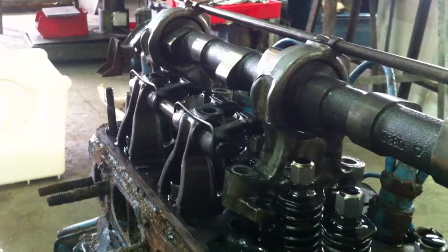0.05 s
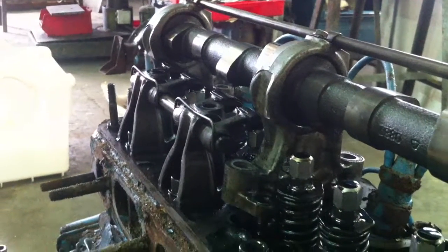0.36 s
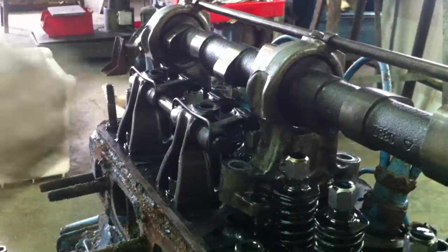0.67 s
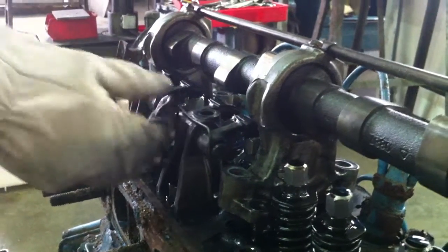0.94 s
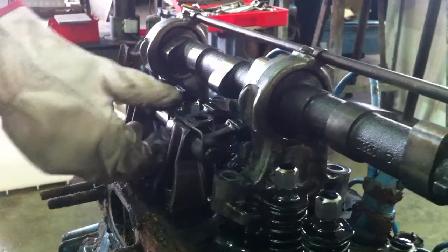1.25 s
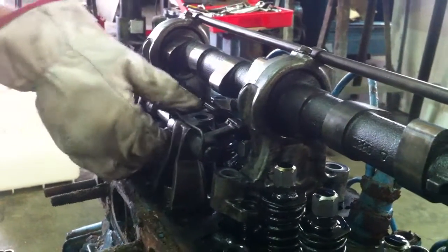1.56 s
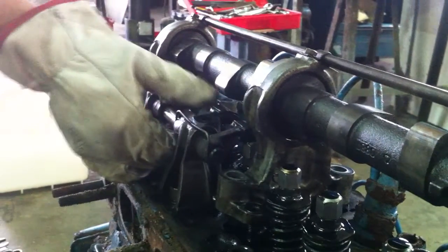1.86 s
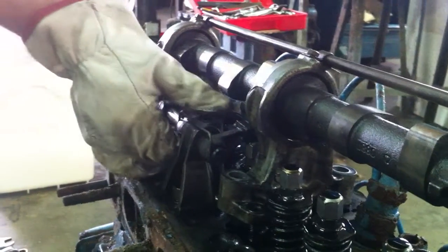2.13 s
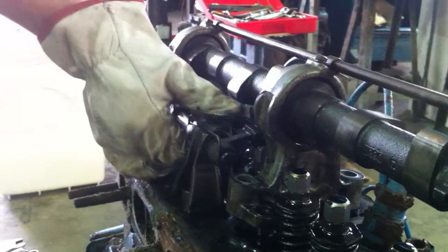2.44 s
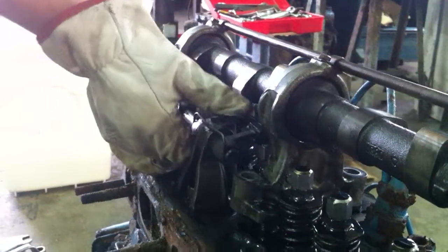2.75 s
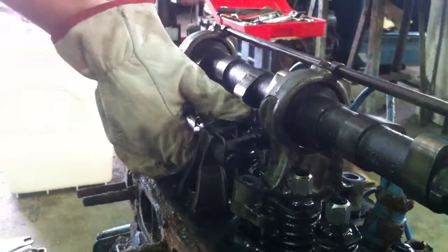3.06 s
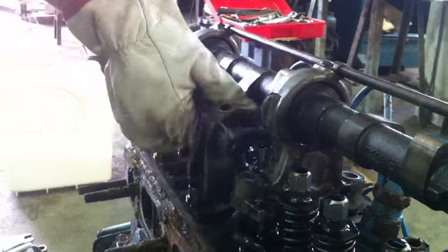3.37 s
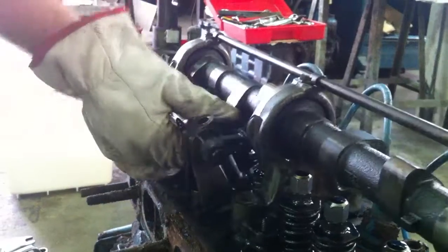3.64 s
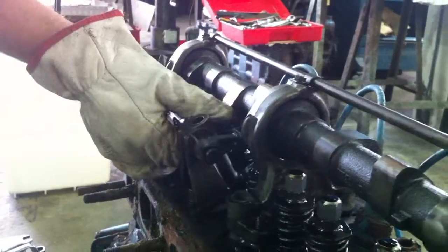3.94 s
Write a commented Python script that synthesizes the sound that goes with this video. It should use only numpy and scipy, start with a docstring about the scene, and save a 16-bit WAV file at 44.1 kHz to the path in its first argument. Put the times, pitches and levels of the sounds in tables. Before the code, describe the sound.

Stuck metal engine part cracks free and clanks into place after faint glove rubbing.

```python
"""A quiet workshop, one microphone near an open cylinder head, over room tone and a machine hum.
A gloved hand grips a rocker arm: leather rubs and taps on oily metal, and one dry tick sounds close by.
At 3.4 s the stuck part breaks free with a run of sharp cracks, scrapes along and clanks home.
Each blow shakes the damped casting; the steel rings on briefly and the hall answers."""
import sys
import numpy as np
from scipy import signal
from scipy.fft import rfft, irfft
from scipy.io import wavfile

SR = 44100
rng = np.random.default_rng(int(sys.argv[2]) if len(sys.argv) > 2 else 0)


def dump_mix(stems):
    """Bounce the given channels to the path in sys.argv[1] as a 16-bit WAV at rate SR."""
    frames = np.atleast_2d(stems).T  # one column per channel
    limited = np.clip(frames, -1, 1)  # hard clip at full scale
    pcm = np.round(limited * 32767).astype(np.int16)
    wavfile.write(sys.argv[1], SR, pcm)


N = 176400
T = np.arange(N) / SR


def from_db(db):
    """Decibels to gain."""
    return 10 ** (np.asarray(db) / 20)


def rms_one(x):
    """Scale to unit rms."""
    return x / np.sqrt(np.mean(x ** 2) + 1e-20)


def fader(curve):
    """Gain over time from points of t/s, level/dB."""
    return from_db(np.interp(T, *np.transpose(curve)))


def at_hz(points, hz):
    """Read a table on a log-frequency axis."""
    f, value = np.transpose(points)
    return np.interp(np.log(np.maximum(hz, 1)), np.log(f), value)


def coloured(x, colour):
    """Equalise by points of f/Hz, relative level/dB; rms 1."""
    gain = from_db(at_hz(colour, np.fft.rfftfreq(len(x), 1 / SR)))
    return rms_one(irfft(rfft(x) * gain, len(x)))


def noise(colour, size=N):
    """Equalised noise; rms 1."""
    return coloured(rng.standard_normal(size), colour)


def decay(t60, size=N):
    """Exponential fall of 60 dB in t60 seconds."""
    return np.exp(-np.log(1000) * T[:size] / t60)


def ring(hz, t60, size=SR // 2):
    """A struck mode: a decaying sine."""
    return np.sin(2 * np.pi * hz * T[:size]) * decay(t60, size)


def lowpass(x, hz):
    """Two-pole low-pass."""
    return signal.sosfilt(signal.butter(2, min(hz, SR * .45), fs=SR, output="sos"), x + 1e-18)


def add(out, start_s, sound):
    """Mix a sound in at a time."""
    i = int(start_s * SR)
    out[i:i + len(sound)] += sound[:N - i]


def struck_modes(rows):
    """One ringing mode for each row of t/s, level/dB, f/Hz, t60/s."""
    out = np.zeros(N)
    for start_s, db, hz, t60 in rows:
        add(out, start_s, from_db(db) * ring(hz, t60))
    return out


def friction(colour, slips_per_s, spread_db):
    """Rubbing surfaces make many tiny slips of uneven size; rms 1."""
    sizes = from_db(spread_db * np.minimum(rng.exponential(1, N), 4))
    signs = rng.choice([-1, 1], N)
    slipping = rng.random(N) < slips_per_s / SR
    return coloured(sizes * signs * slipping, colour)


def workshop():
    """The background: room tone, a wavering machine hum and a dull sound dying away at the start."""
    # spectra of the room tone and the dull sound: f/Hz, relative level/dB
    air_colour = [(15, -63), (25, -38), (69, -28), (119, -17), (164, -5), (267, -8.5), (297, -1),
                  (359, -12.5), (389, -5.5), (421, -11), (614, -13.5), (666, -14), (919, -16.5),
                  (3440, -22), (15500, -29)]
    fading_colour = [(150, -21), (330, -4), (480, 1), (700, -7), (1200, -22), (5000, -30), (15000, -40)]
    hum_hz = 299.5
    waver = 1 + .4 * rms_one(lowpass(rng.standard_normal(N), hz=4))
    hum = from_db(-76) * np.sqrt(2) * np.sin(2 * np.pi * hum_hz * T) * waver
    air = from_db(-65.5) * noise(air_colour)
    fading = from_db(-59.5) * decay(t60=.6) * noise(fading_colour)
    return air + hum + fading


def hall(x):
    """The hall's answer alone: a diffuse tail that builds up and dies sooner in the treble."""
    # spectrum of the tail before it decays: f/Hz, relative level/dB
    tail_colour = [(60, -30), (200, -5.5), (500, 0), (1000, -2), (2000, -1.5), (2900, 3), (4500, 0),
                   (7000, -5.5), (10000, -3), (16000, 0)]
    # reverberation time: f/Hz, t60/s
    reverb_times = [(100, .6), (700, .9), (2500, .8), (5000, .6), (9000, .4), (16000, .25)]
    spectrum = rfft(noise(tail_colour, size=SR))
    hz = np.fft.rfftfreq(SR, 1 / SR)
    centres = np.geomspace(60, 16000, 12)
    tail = np.zeros(SR)
    for centre, share in zip(centres, np.eye(len(centres))):
        band = irfft(spectrum * at_hz(np.c_[centres, share], hz), SR)  # overlapping triangular bands
        tail += band * decay(at_hz(reverb_times, centre), size=SR)
    build_up = 1 - np.exp(-(T[:SR] / .012) ** 2)  # over about 12 ms
    response = rms_one(tail * build_up) / np.sqrt(SR)  # unit energy
    return from_db(-14) * signal.fftconvolve(x, response)[:N]


def tick():
    """One dry tick close to the microphone: a short tone with a hard edge."""
    body = from_db(-46) * ring(hz=800, t60=.005)
    edge = ring(hz=2500, t60=.0012) + .4 * decay(t60=.0003, size=SR // 2)
    out = np.zeros(N)
    add(out, start_s=2.4253, sound=body + from_db(-29) * lowpass(edge, hz=3000))
    return out


def glove():
    """Leather slides on oily metal, drags dully as it grips and taps the parts."""
    # course of the slide and the drag: t/s, level/dB
    slide_levels = [(.38, -85), (.46, -64), (.54, -79), (1.2, -80), (1.45, -72.5), (1.62, -77),
                    (1.655, -62.5), (1.69, -77), (1.75, -72), (1.805, -55), (1.87, -62.5), (1.95, -69),
                    (2.1, -75.5), (2.3, -87)]
    drag_levels = [(.38, -80), (.47, -68), (.56, -87), (1.3, -79.5), (1.76, -72), (1.87, -63.5),
                   (1.95, -59.5), (1.99, -67), (2.15, -67.5), (2.3, -75.5)]
    # their spectra: f/Hz, relative level/dB
    slide_colour = [(200, -15), (800, -12), (1600, -0.5), (2600, 1.5), (3600, -5.5), (5500, -1.5),
                    (8000, -10.5), (15000, -18)]
    drag_colour = [(100, -23), (200, -4), (700, 0.5), (930, 2), (1200, -3.5), (2200, -3), (4000, -15.5),
                   (12000, -25)]
    # light taps: t/s, level/dB, f/Hz, t60/s
    taps = [(1.03, -59, 2500, .015), (1.925, -58, 175, .08), (1.951, -47, 930, .04),
            (1.952, -52.5, 200, .06), (2.030, -50.5, 950, .02), (2.125, -50.5, 420, .04),
            (2.126, -52, 1200, .012)]
    slide = fader(slide_levels) * friction(slide_colour, slips_per_s=9000, spread_db=3.0)
    drag = fader(drag_levels) * friction(drag_colour, slips_per_s=1500, spread_db=2.5)
    return slide + drag + struck_modes(taps)


def scrape():
    """Steel slips over steel as the freed part moves."""
    # course of the scrape: t/s, level/dB
    scrape_levels = [(3.39, -90), (3.41, -44), (3.45, -37.5), (3.52, -66), (3.56, -50.5), (3.61, -41),
                     (3.66, -41.5), (3.71, -53.5), (3.75, -49), (3.79, -65), (3.85, -61), (3.96, -61),
                     (4, -80)]
    # its spectrum: f/Hz, relative level/dB
    scrape_colour = [(60, -48), (200, -5), (600, 2.5), (1100, 1.5), (2200, -5), (3500, -14), (6000, -21),
                     (10000, -37), (16000, -37)]
    return fader(scrape_levels) * friction(scrape_colour, slips_per_s=1200, spread_db=2.5)


def edge_pings():
    """Small steel edges ping, one high mode each."""
    # pings: t/s, level/dB, f/Hz, t60/s
    pings = [(.058, -50, 4240, .08), (3.428, -33.5, 9300, .035), (3.428, -33, 14300, .02),
             (3.440, -39, 9350, .04), (3.602, -42, 6650, .035), (3.6337, -45, 9700, .015),
             (3.636, -45.5, 13020, .07), (3.639, -35.5, 5900, .015)]
    return struck_modes(pings)


def steel_ring():
    """The hardest knock leaves the steel ringing."""
    # modes of the steel: f/Hz, relative level/dB, t60/s
    steel_modes = [(699, 2.5, .7), (726, 0.5, .55), (863, -18, .7), (1110, -4.5, .6), (1254, -14, .35),
                   (1472, -19, .5), (1717, -16, .6), (1970, -12, .7), (2229, -15, .4)]
    start_s, ring_db = 3.6585, -38
    return struck_modes([(start_s, ring_db + db, hz, t60) for hz, db, t60 in steel_modes])


def blows(rows, colour, splash_trim_db, splash_t60, snap_cycles):
    """Each contact is a short snap, a splash of dense resonances and the modes of the casting."""
    # modes of the well-damped cast head: f/Hz, relative level/dB, t60/s
    casting_modes = [(170, -33, .1), (258, -22, .11), (370, -26.5, .06), (495, -28, .07), (786, -14, .06),
                     (922, -16, .06), (1140, -17, .06), (1290, -22, .05), (1770, -18.5, .06),
                     (2350, -26, .05), (2715, -23, .08)]
    out, size = np.zeros(N), SR // 5
    for start_s, db, snap_hz, bright_hz, splash_db, casting_db in rows:
        snap = ring(snap_hz, snap_cycles / snap_hz, size)
        splash = lowpass(noise(colour, size) * decay(splash_t60, size), bright_hz)
        casting = np.zeros(size)
        for hz, mode_db, t60 in casting_modes:
            strength = from_db(mode_db + rng.normal(0, 2)) * rng.choice([-1, 1])
            casting += strength * ring(hz, t60, size)
        blow = snap + from_db(splash_trim_db + splash_db) * splash + from_db(casting_db) * casting
        add(out, start_s, from_db(db) * blow)
    return out


def break_free():
    """The stuck rocker arm lets go in a run of sharp cracks."""
    # cracks: t/s, level/dB, snap f/Hz, splash cutoff f/Hz, relative splash/dB, relative casting/dB
    cracks = [(3.4115, -31, 1700, 2500, -4, -8), (3.4168, -28.5, 1600, 2500, -4, 1),
              (3.4198, -38, 950, 1800, -6, 4), (3.4279, -19.5, 6300, 14000, 0.5, 1.5),
              (3.4399, -27.5, 7400, 14000, 6.5, -1), (3.4493, -18.5, 4900, 5500, -2, -0.5),
              (3.4517, -24, 4800, 5000, -4, -4), (3.4572, -14.5, 2800, 4500, -2, -6.5)]
    # spectrum of their splash: f/Hz, relative level/dB
    crack_colour = [(40, -16), (120, -25), (250, -8), (500, -1), (1000, 4), (2800, 3.5), (3600, -0.5),
                    (6200, 1), (8000, -16), (9300, -8), (11500, -32), (14500, -1), (16000, -17)]
    return blows(cracks, crack_colour, splash_trim_db=-7.5, splash_t60=.028, snap_cycles=14)


def clank_home():
    """The rocker arm seats with a cluster of lower, duller knocks."""
    # knocks: t/s, level/dB, snap f/Hz, splash cutoff f/Hz, relative splash/dB, relative casting/dB
    knocks = [(3.549, -32.5, 1100, 2500, 13, 1), (3.585, -34, 700, 2500, -12, 1),
              (3.591, -38, 1600, 2500, 2, -14), (3.603, -36.5, 600, 2000, -9, 7),
              (3.6118, -18.5, 1100, 6000, -5, -4.5), (3.6185, -26, 850, 1500, -3, -15),
              (3.6254, -19, 1300, 2000, -9, -6), (3.6306, -28, 1000, 1800, 8, -16),
              (3.6377, -21.5, 850, 5000, -1.5, -7), (3.645, -23, 1700, 3500, 4, 6),
              (3.6505, -18.5, 950, 2500, 2.5, -4), (3.6583, -14.5, 2000, 3500, 3.5, -2.5),
              (3.661, -21.5, 720, 2200, 1.5, 5), (3.665, -20, 750, 2200, -5, -10),
              (3.742, -34.5, 1100, 6000, 2, 6.5), (3.948, -46, 1300, 3500, -9, 2)]
    # spectrum of their splash: f/Hz, relative level/dB
    knock_colour = [(40, -17), (110, -18), (240, 1.5), (450, -6), (800, 6), (1400, -3), (2300, 3.5),
                    (3200, -5.5), (6000, -15), (10000, -25), (16000, -20)]
    return blows(knocks, knock_colour, splash_trim_db=-8, splash_t60=.03, snap_cycles=6)


def scene():
    """Hand and metal up close with the hall behind; the steel's ring and the tick stay dry. Mono."""
    near = break_free() + clank_home() + edge_pings() + scrape() + glove()
    return (near + hall(near) + steel_ring() + tick() + workshop())[None]


def record(dry):
    """A steep low-pass takes off the very top."""
    cutoff_hz = 15900
    return signal.sosfilt(signal.ellip(12, .1, 80, cutoff_hz, fs=SR, output="sos"), dry)


dry = scene()
out = record(dry)
dump_mix(out)
```